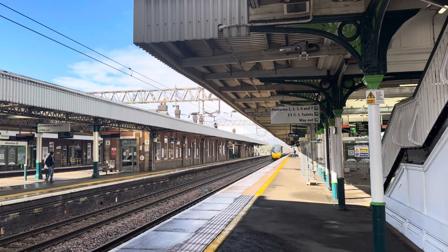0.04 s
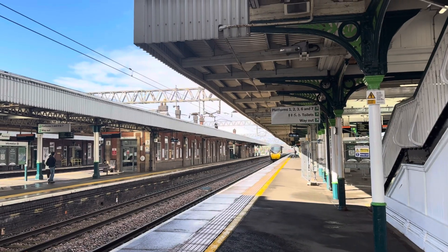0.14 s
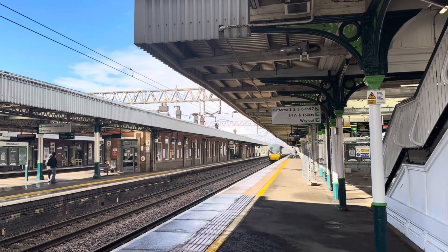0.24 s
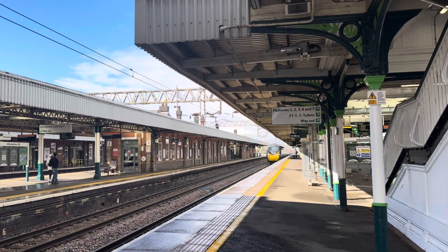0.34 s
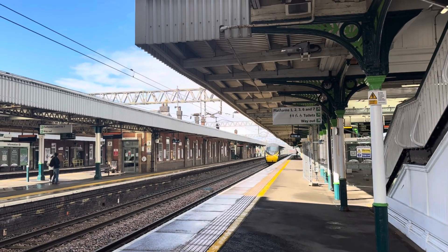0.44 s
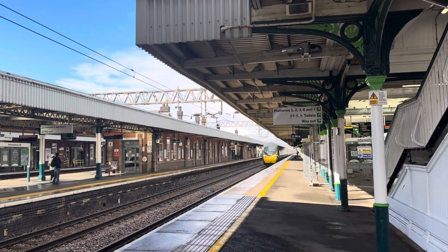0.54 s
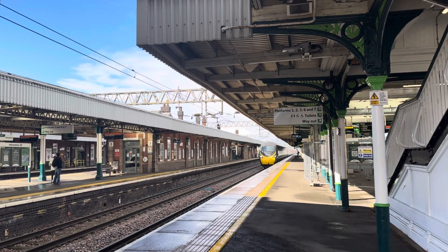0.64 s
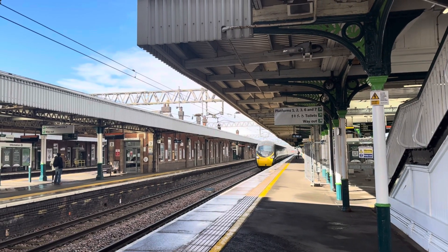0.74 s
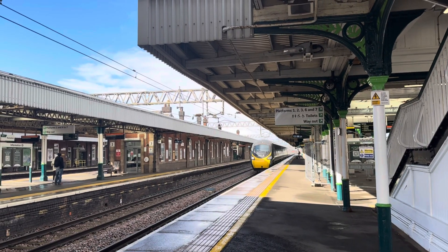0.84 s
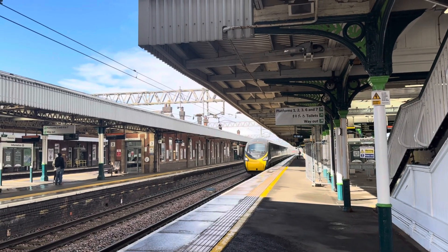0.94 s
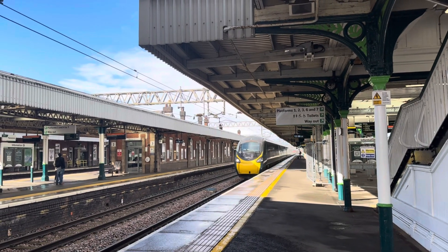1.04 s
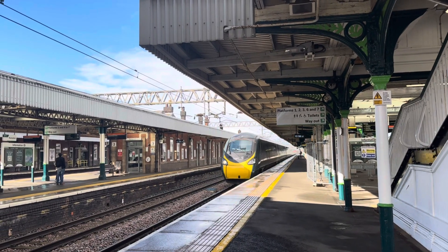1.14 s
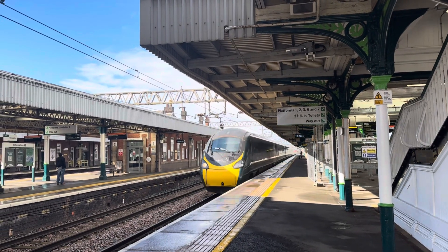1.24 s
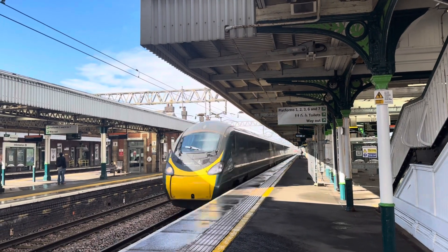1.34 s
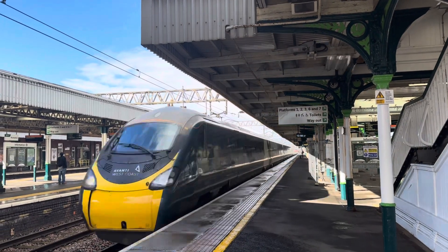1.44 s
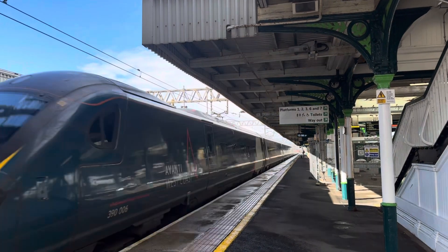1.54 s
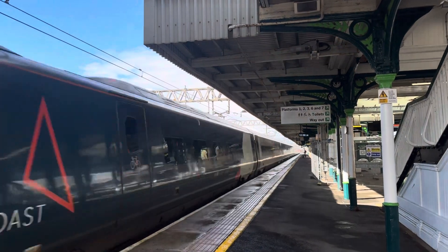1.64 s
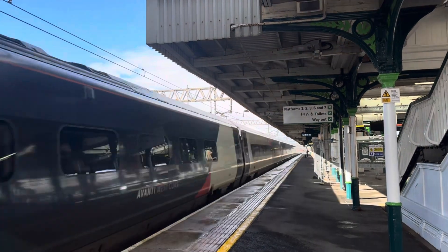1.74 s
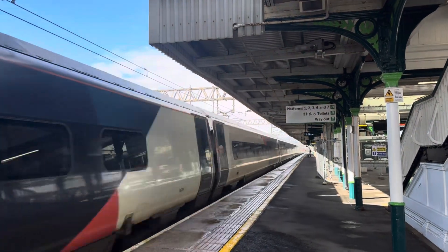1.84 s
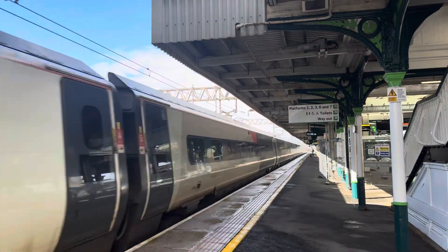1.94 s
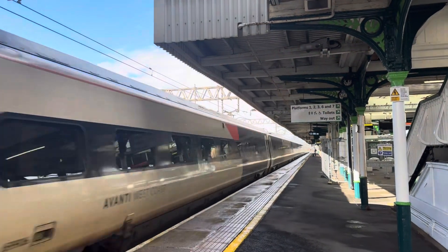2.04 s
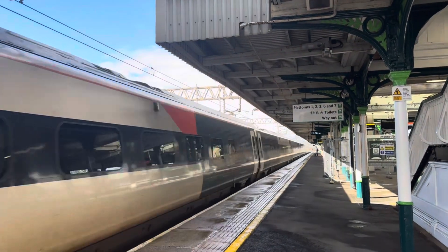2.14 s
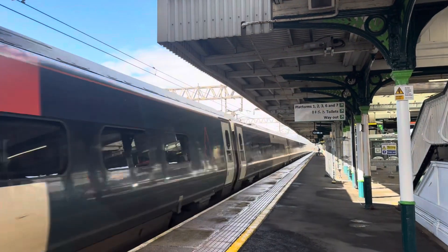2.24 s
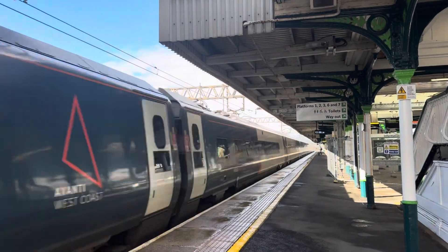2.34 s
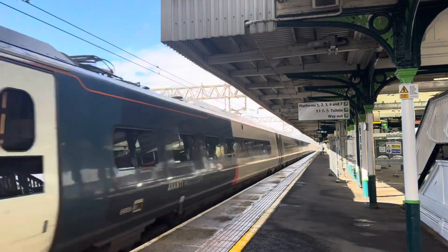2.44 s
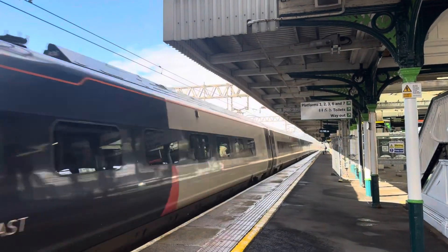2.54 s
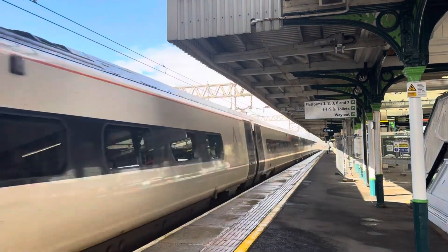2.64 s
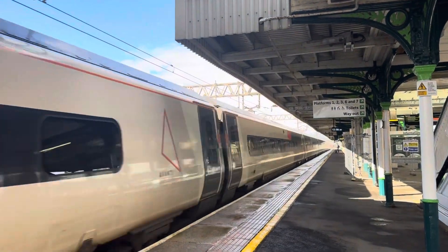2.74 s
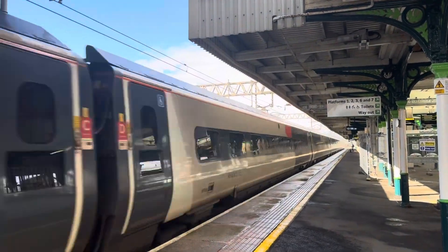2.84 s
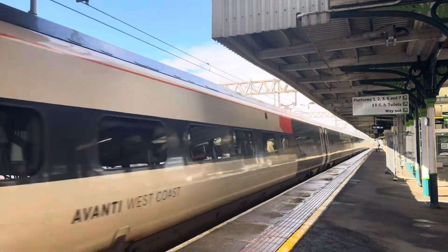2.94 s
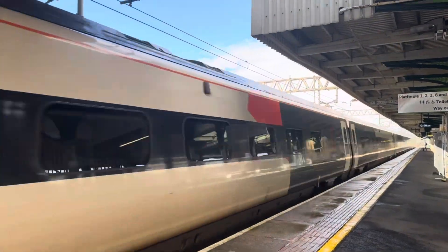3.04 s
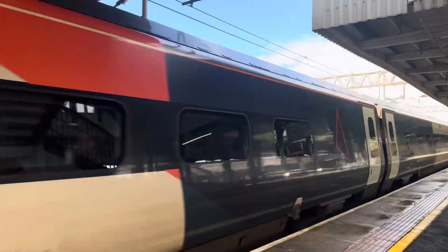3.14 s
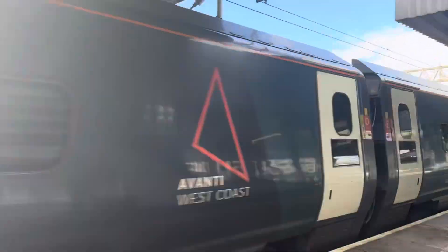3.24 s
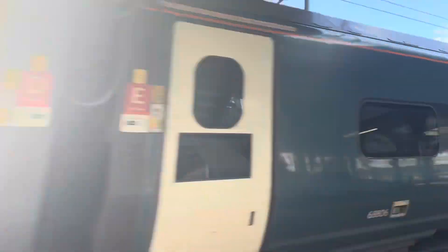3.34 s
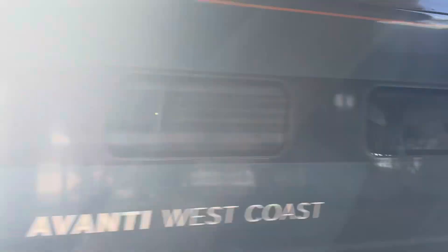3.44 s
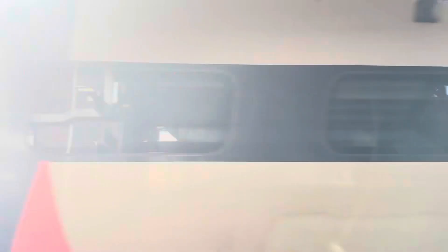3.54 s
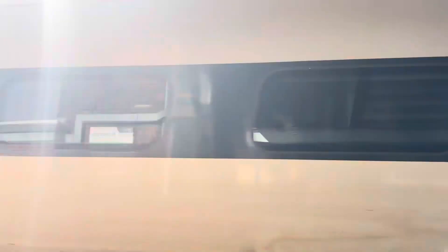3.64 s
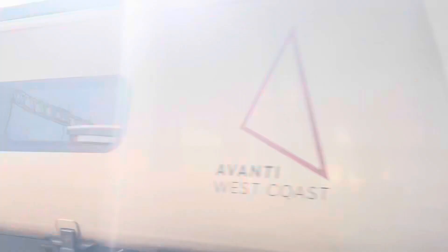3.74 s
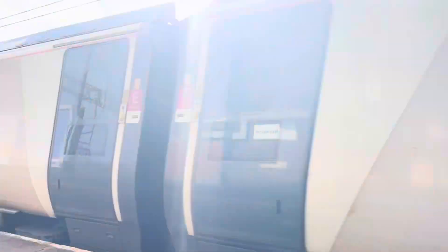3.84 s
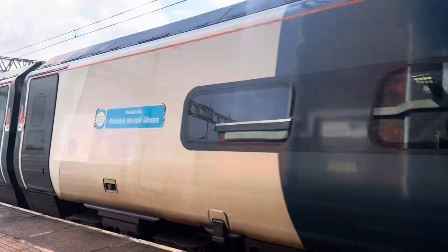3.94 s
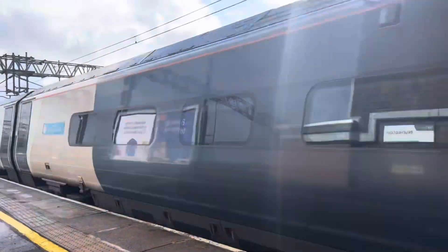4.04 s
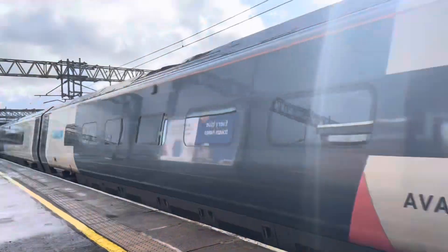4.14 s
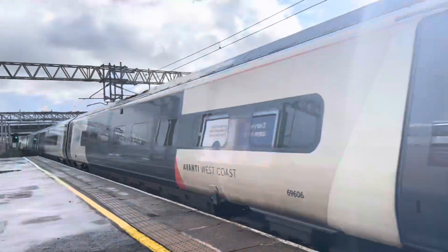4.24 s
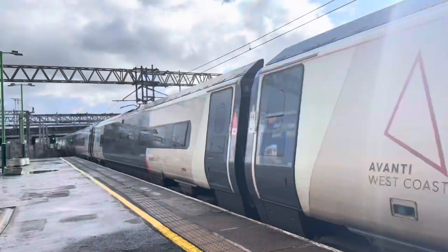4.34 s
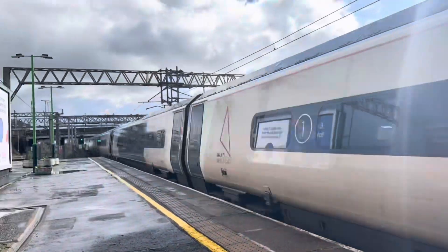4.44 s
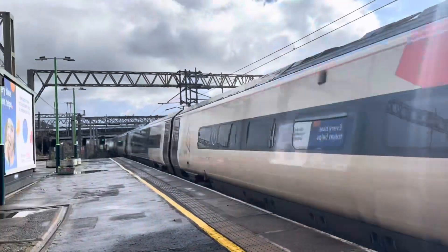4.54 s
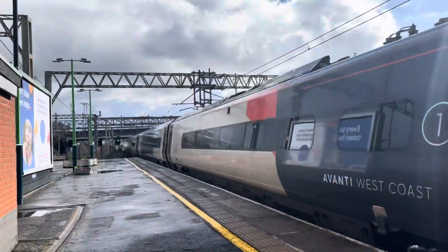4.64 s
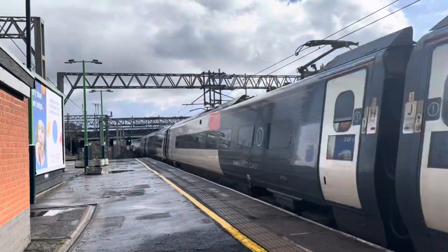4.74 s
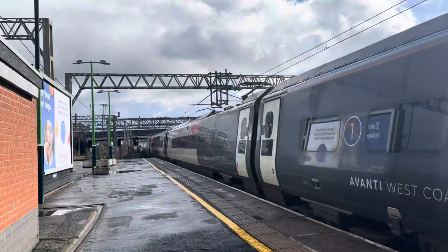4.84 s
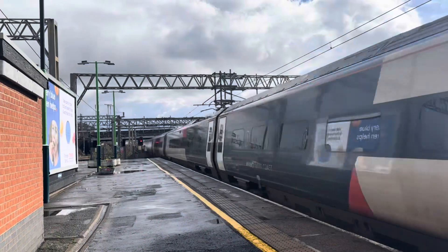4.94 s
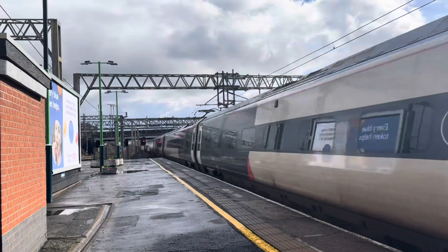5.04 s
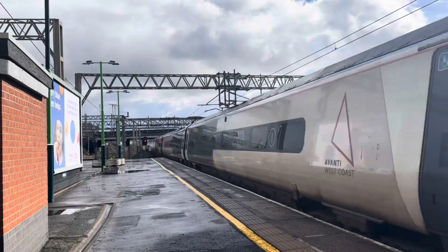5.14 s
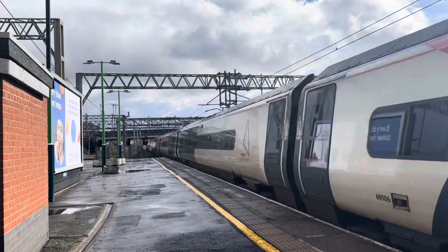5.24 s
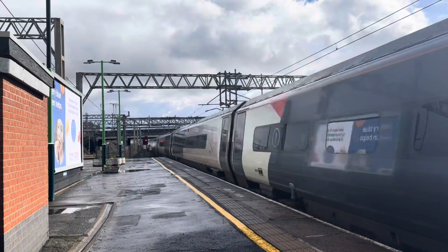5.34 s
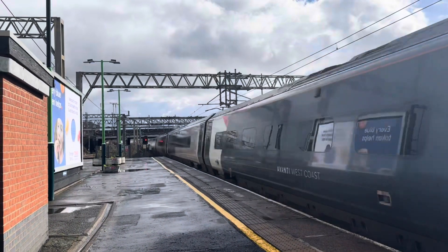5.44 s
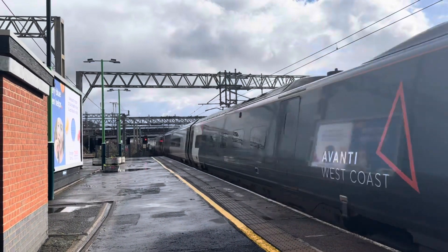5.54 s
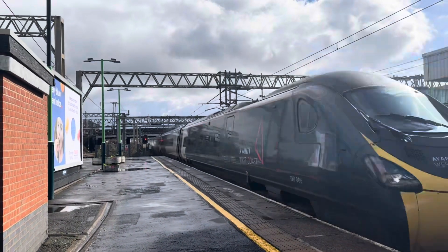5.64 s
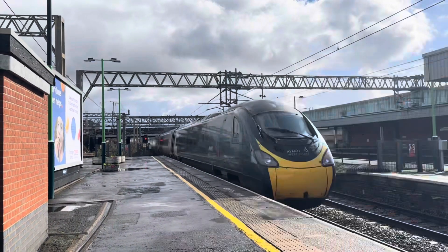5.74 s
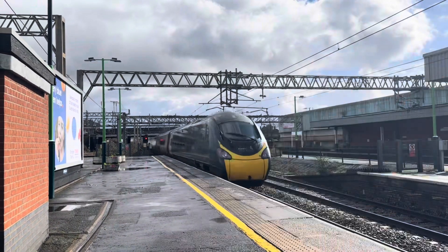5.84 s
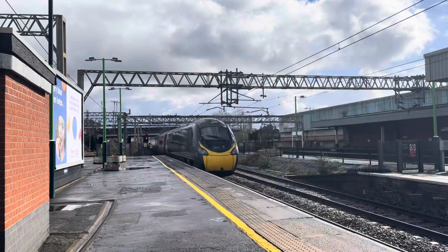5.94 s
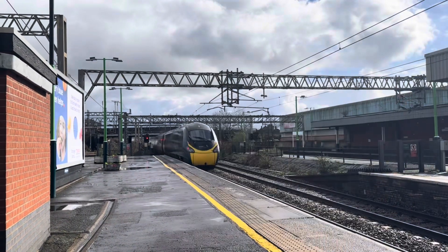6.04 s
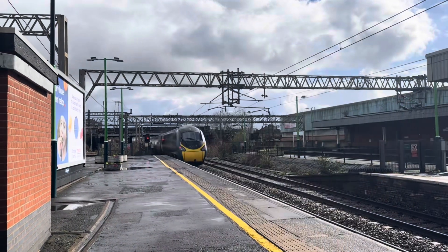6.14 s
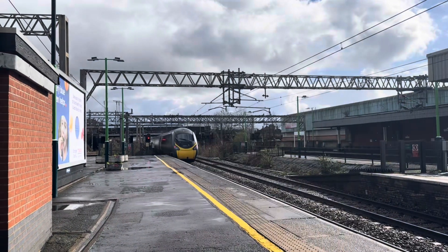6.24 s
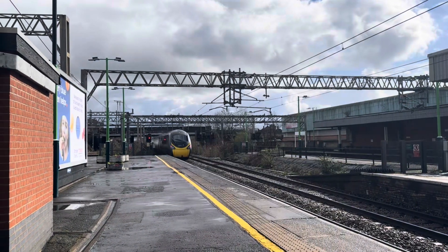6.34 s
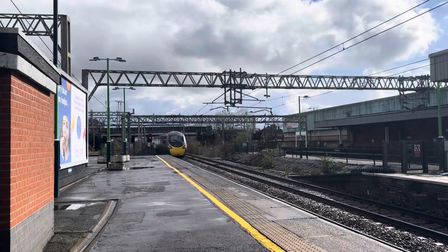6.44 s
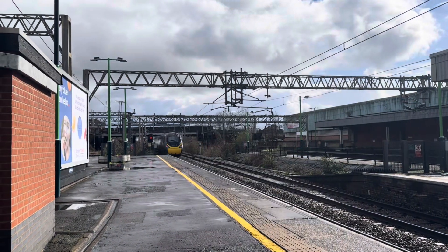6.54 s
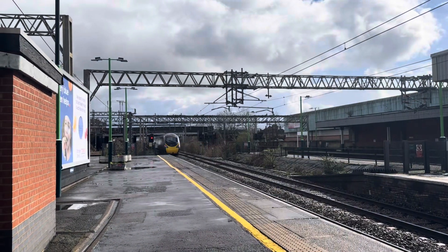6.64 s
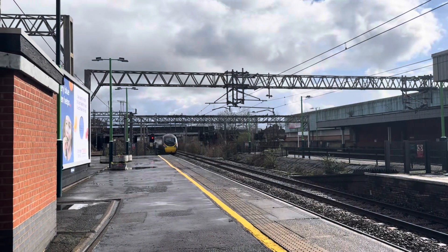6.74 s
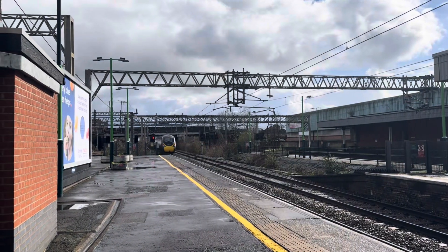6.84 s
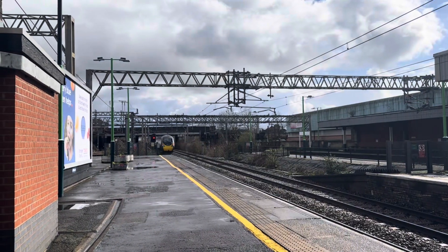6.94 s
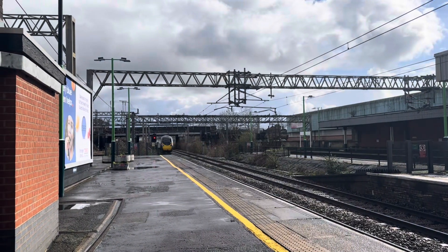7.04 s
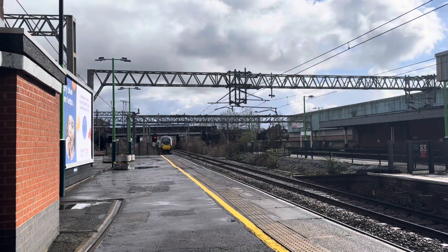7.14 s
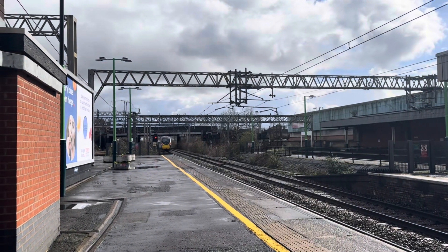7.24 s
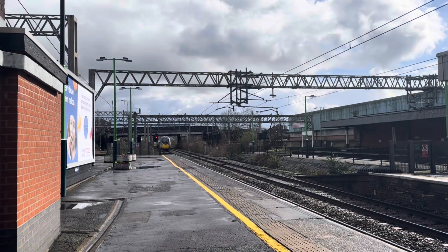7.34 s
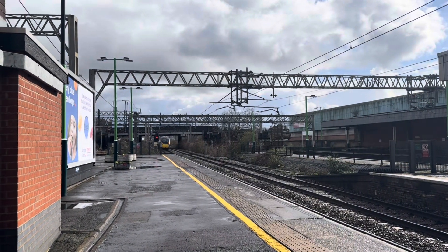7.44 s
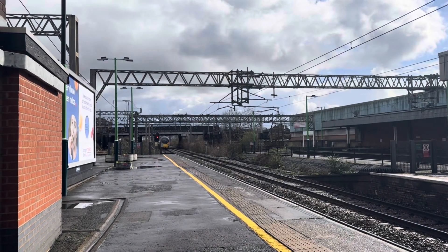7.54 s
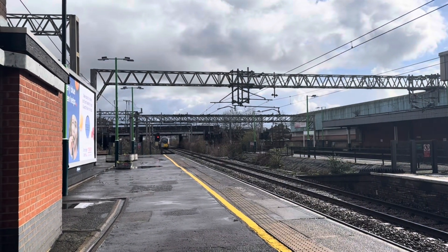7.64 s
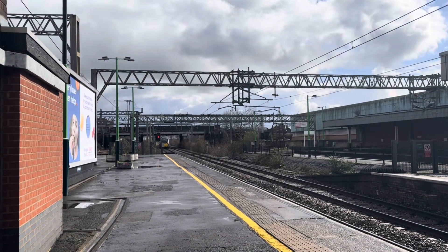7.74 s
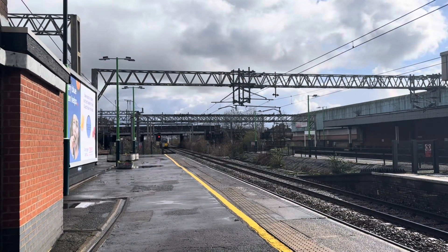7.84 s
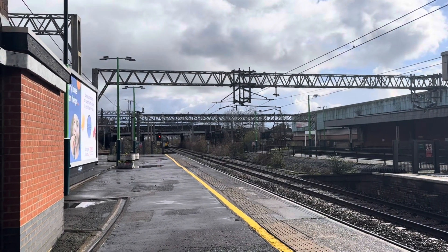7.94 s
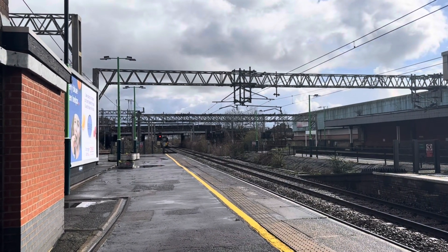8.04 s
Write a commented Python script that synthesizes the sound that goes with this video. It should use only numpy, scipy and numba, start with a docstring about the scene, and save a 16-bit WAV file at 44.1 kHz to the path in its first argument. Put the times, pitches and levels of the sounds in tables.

```python
"""On a station platform an electric express runs past a phone, which turns to follow it.
The rails sing ahead of the train as thin modes and hiss of filtered noise. Resonant noise makes the
track rumble, boom and rings of rails and wheels; shaped noise makes body roar, rushing air and station.
They swell with the nose, pulse with each pair of bogies and die away behind the tail."""
import sys
import numpy as np
from scipy import signal
from scipy.fft import rfft, irfft, next_fast_len
from scipy.io import wavfile
from scipy.ndimage import uniform_filter1d
from numba import njit

SR = 44100
rng = np.random.default_rng(int(sys.argv[2]) if len(sys.argv) > 2 else 0)


def log_audio(samples):
    """Write samples as a 16-bit WAV file to the path given in sys.argv[1]."""
    # one column per channel
    frames = np.atleast_2d(samples).T
    # limit to full scale, then quantise
    limited = np.clip(frames, -1, 1)
    pcm = np.round(limited * 32767).astype(np.int16)
    wavfile.write(sys.argv[1], SR, pcm)


N = 357651
SIZE = next_fast_len(N)  # transform length in samples

# All widths below are those of one pass of a resonance; ring() passes the noise twice.
# A half length is the time in which a bell-shaped rise falls to 1/e of its height.

# Singing rails. Each row: mode in Hz, width in Hz, dB ahead of the train, dB behind it (added to the approach
# and departure levels).
SINGING_MODES = [(6420, 60, -14, -11), (6870, 70, -9, -9), (7170, 70, -20, -3), (7310, 50, -8, -18),
                 (7670, 45, -1.5, -18), (8390, 80, -9, -15), (10700, 80, -6, -9)]
# Broad hiss of the rails. Each row: centre in Hz, width in Hz, dB ahead, dB behind (added likewise).
RAIL_HISS = [(1370, 850, 14.3, 5), (3900, 1700, 7.6, -12), (7860, 7700, 0.99, -2),
             (10200, 14000, 0.77, 5.5), (11500, 6000, 4.1, 6.5)]
# Level of the singing on approach. Each row: time in seconds, level in dB.
SINGING_AHEAD = [(0, -53), (.5, -49), (1.0, -46), (1.3, -47), (1.7, -80)]
# Level of the singing after departure. Each row: time in seconds, level in dB.
SINGING_BEHIND = [(5.2, -85), (5.9, -61), (6.5, -63), (7.3, -67), (8.11, -77)]
SING_WAVER, SING_FLICKER_DB = .002, 2.5  # rms share of the pitch; rms patchiness

# Station background spectrum. Each row: frequency in Hz, relative level in dB per Hz.
STATION_SPECTRUM = [(30, -5), (90, 8), (200, 1.5), (500, -39), (1200, -50), (2000, -15.5), (5000, -31.5),
                    (8000, -73), (11000, -50), (15800, -40)]
STATION_DB = -41

# Level of each layer before the swells. Each row: time in seconds, then in dB: buffeting air, track rumble,
# underframe boom, body roar, rail ring, wheel ring, air rush.
PASSING = [(0, -48, -29.5, -45, -37.5, -32.5, -38, -47), (.35, -28, -24.5, -33.5, -31.5, -33.5, -35.5, -43),
           (.8, -28, -19.5, -34, -23.5, -24.5, -33.5, -35), (1.26, -29, -12.5, -29, -14.5, -21, -27, -26),
           (1.6, -22, -20.5, -19.5, -14.5, -20.5, -26, -24.5),
           (1.83, -28, -22.5, -18.5, -17, -31.5, -26.5, -26),
           (2.25, -31.5, -30.5, -24, -22, -29.5, -27.5, -29.5),
           (2.68, -31, -22.5, -25, -25, -35, -31.5, -32.5), (3.6, -38, -25, -30, -27, -32.5, -32, -33.5),
           (4.45, -36.5, -25, -29.5, -27.5, -36.5, -32, -34.5),
           (5.4, -31, -25, -28, -27.5, -33.5, -33, -33), (5.65, -30.5, -27, -26, -28, -35.5, -35, -35),
           (5.94, -39, -32, -35, -38.5, -40, -41, -42.5), (6.4, -39, -41, -40, -42.5, -44, -44.5, -47),
           (7.1, -39, -42, -42.5, -46.5, -49, -49, -58), (7.6, -40.5, -43.5, -44, -57, -53, -51.5, -66),
           (8.11, -47, -52, -47, -53.5, -52, -58, -67)]
# Pairs of bogies. Each row: time abreast in seconds, wheel mode in Hz before Doppler shift, its level in dB
# before fading, dB louder from behind, fading distance in m, then swell in dB of roar, rail ring, wheel ring, air rush.
BOGIES = [(1.26, 2100, -35.5, 15, 26, 0, -0.5, -7, 1), (2.02, 2390, -34.5, -2, 40, 1.5, 5, 5, 3.5),
          (2.47, 2230, -41, -8, 36, 1.5, 6.5, 3, 2.5), (2.9, 2298, -42, -3.5, 40, 1, 6.5, 3.5, 2.5),
          (3.36, 2255, -39, 4, 47, 2, 1.5, 4, 2), (3.8, 2250, -43, -1, 43, 0.5, 3.5, 2.7, 2),
          (4.21, 2315, -42, 6, 45, -0.5, 4, -1, 2.5), (4.66, 2300, -41.5, 10, 60, 5.5, 6, 1.5, 3),
          (5.12, 2300, -40, 8, 30, 2.5, 4, 0.5, 3), (5.55, 2250, -52, 9, 78, -3, 1, 1, 1)]
# Half lengths in seconds of those four swells, in the same order.
SWELL_S = (.06, .08, .09, .11)
# Lags in seconds of the four swells after the time abreast.
SWELL_LAG_S = (-0.015, 0.0065, 0.006, 0.013)
# Gusts of the slipstream, the centre gliding between them. Each row: time in seconds, centre in Hz,
# buffet rise in dB, boom rise in dB, half length in seconds.
GUSTS = [(.09, 55.7, 14, 3, .04), (0.347, 54, 10.5, -4, 0.1), (1.445, 51.5, 6, 7, 0.061),
         (1.7, 40, 13, 5, 0.056), (1.785, 38, 15, -4.5, 0.037), (2.04, 52, 7, -1, 0.069),
         (2.44, 55, 9.5, 0, 0.074), (2.88, 55, 6, 5.5, 0.037), (3.36, 55, 7, 2, 0.094),
         (3.86, 60, 10, 3, 0.08), (4.14, 56.7, 8, 0, .05), (4.77, 60, 8, 4, 0.046),
         (5.63, 46, 12, 3.5, 0.097), (5.95, 52, 10.5, 0, 0.055), (6.798, 54.6, -3, 6, 0.084),
         (7.5, 54, -1, 7.5, 0.087)]
# Surges of the track rumble, the centre gliding between them. Each row: time in seconds, centre in Hz,
# rise in dB, half length in seconds.
SURGES = [(0.11, 68, 7.5, .055), (0.46, 76, 3.5, .03), (.715, 68, 4, 0.021), (1.13, 84, 2.5, 0.063),
          (1.8, 76.5, 6, 0.036), (1.943, 76, 13, 0.056), (2.09, 82, 6.5, 0.073), (2.435, 101, 7, 0.21),
          (2.935, 93, 6, 0.055), (3.08, 86, -3, 0.055), (3.64, 82.6, 7, 0.1), (3.813, 108, 11.5, 0.036),
          (4.06, 90, -4, .06), (4.28, 95, 11, 0.035), (4.623, 114, 5, 0.094), (5.0, 89.4, 2.5, .1),
          (5.812, 81.5, 8, 0.032), (6.497, 101, 10, 0.051), (6.796, 85, 9.5, 0.067), (6.996, 76, 9, 0.059),
          (7.547, 109, 9.5, 0.078), (8.027, 72.5, 13, 0.071)]
BUFFET_WIDTH_HZ, BUFFET_WAVER_DB = 21.6, 2.5
RUMBLE_WIDTH_HZ, RUMBLE_WAVER_DB = 42, 1.2
FLARE_S, FLARE_DB, FLARE_HALF_S = 5.28, 4, 0.063  # the air hiss flares once near the tail

BOOM_HZ, BOOM_WIDTH_HZ = 160.7, 159
# Body roar spectrum. Each row: frequency in Hz, relative level in dB per Hz.
ROAR_SPECTRUM = [(150, -26), (230, -1.5), (300, -1), (400, -4), (600, -7), (1000, -9.5), (1400, -15),
                 (2500, -18), (5000, -40.5)]

# Broad rail resonances. Each row: centre in Hz before the drift, width in Hz, relative level in dB.
RAIL_MODES = [(711, 234, -3), (891, 190, -5.5)]
# Broad wheel resonances. Each row: centre in Hz before the drift, width in Hz, relative level in dB.
WHEEL_MODES = [(2250, 1200, -1), (1618, 590, -3)]
# Pitch drift of the broad steel ring. Each row: time in seconds, factor.
STEEL_PITCH = [(0, 0.96), (1.2, 0.93), (1.9, 0.98), (3.5, 1.01), (5.3, 0.95), (6.0, 0.91), (8.11, 0.98)]
# Sharpest rail mode, between two sleepers. Each row: time in seconds, centre in Hz, dB over the broad rail
# ring before the pulses.
RAIL_TONE = [(0, 800, -17), (.6, 810, -1), (1.3, 855, -10), (2.0, 785, -5.5), (4.2, 760, 2.5),
             (5.15, 790, 0.5), (5.8, 710, -2.5), (6.5, 695, 2), (7.0, 665, -0.5), (7.5, 692, 3.5),
             (8.11, 700, -13)]
RAIL_TONE_WIDTH_HZ = 60
TONE_PULSE_DB, TONE_PULSE_S, TONE_FLUTTER_DB = 4.5, 0.16, 1.5  # pulse height, its half length, rms flutter

SPEED, SOUND, TRACK_M = 54, 343, 9  # train in m/s, sound in m/s, distance to the track
WHEEL_MODE_WIDTH_HZ, WHEEL_FLUTTER_DB = 160, 3
MODE_LAG_S = 0.055  # wheel modes pass this long after the time abreast
FADE_DB = 6  # lost to air and screening at a pair's fading distance

# Air rush spectrum. Each row: frequency in Hz, relative level in dB per Hz.
AIR_SPECTRUM = [(1500, -12), (2800, -2), (4000, -2.5), (6500, -5), (8300, -4), (10500, -9.5),
                (12500, -13.5), (15800, -21.5)]
# Borders in Hz between the bands of air that flicker separately.
AIR_SPLIT_HZ = (4500, 6500, 9000, 12000)

# Brief wheel whistles, the centre gliding between them. Each row: time in seconds, centre in Hz, level in dB,
# half length in seconds.
WHISTLES = [(.62, 1580, -35, .06), (1.4, 1795, -32, .06), (1.56, 1893, -24.5, 0.11),
            (1.97, 2400, -34, 0.08), (2.07, 1850, -28, .04), (2.59, 2170, -36, 0.037),
            (2.99, 2305, -31, 0.098), (3.294, 2340, -32.5, 0.075), (3.39, 2100, -38, .05),
            (3.63, 1940, -39, 0.098), (4.43, 2020, -37, .05), (5.3, 1994, -35, 0.065)]
WHISTLE_WIDTH_HZ, WHISTLE_SPLIT = 75, .025  # each strand's mean offset is this share of the centre
# Knocks under the floor. Each row: time in seconds, centre in Hz, level in dB.
KNOCKS = [(4.643, 420, -26), (4.66, 620, -26), (5.085, 910, -28)]
KNOCK_HALF_S, KNOCK_WIDTH_HZ = 0.012, 160
# Two strands left ringing behind the tail. Each row: time in seconds, level in dB, lower Hz, upper Hz.
STRANDS = [(5.5, -80, 1930, 2050), (6.0, -53, 1930, 2060), (6.4, -54, 1900, 1975), (6.7, -54, 1900, 1980),
           (7.35, -56, 1900, 2030), (7.7, -67, 1900, 2000)]
STRAND_WIDTH_HZ = 35

# Bass of the two channels in every view. Each row: frequency in Hz, likeness from 0 to 1, radians by which
# the right leads, left minus right in dB.
STEREO_BASS = [(30, .96, 0, 0), (80, .975, 0, 0), (150, .92, 0, .2)]
# Channels with the train ahead. Each row: frequency in Hz, likeness, right lead in radians, left minus right in dB.
TRAIN_AHEAD = [(400, 0.92, 0.34, 1), (800, 0.67, -1, 4), (1060, 0, -1, 7), (1420, 0.77, 2.5, 2),
               (1970, 0.45, -0.5, -0.5), (2840, 0.87, -2, 5.5), (3820, 0.37, 1, 2.5),
               (6150, 0.15, -6, -0.5), (6900, 0.35, 8, 0)]
# Channels with the train on the left. Each row: frequency in Hz, likeness, right lead in radians, left minus
# right in dB.
TRAIN_LEFT = [(440, 0.95, -1, 0), (800, 0.87, -1.5, 4.5), (1210, 0.34, -3, 2), (1500, 0.65, -4.5, 0),
              (2040, 0.45, -6, 0.5), (2935, 0.68, -9, 5), (3714, 0.72, 7, 5.5), (5970, 0.68, -28, 0.5),
              (6870, 0.14, 9.5, -0.5)]
# Channels with the train on the right. Each row: frequency in Hz, likeness, right lead in radians, left minus
# right in dB.
TRAIN_RIGHT = [(400, 0.7, 0.61, 0.5), (800, 0.29, 0.26, -0.5), (1110, 0.34, 0.84, 1), (1480, 0.16, 1.8, 0),
               (2100, 0.38, -0.17, 0), (2630, 0.68, -1.93, 3), (4000, 0.1, -0.48, 2),
               (6140, 0.4, -0.01, 0.5), (7000, 0.1, 0.99, -0.5)]
# Place of the train as the phone turns. Each row: time in seconds, share on the left, share on the right.
VIEW = [(0, 0, 0), (1.3, 0, 0), (1.7, 1, 0), (3.3, 1, 0), (3.8, 0, 1), (5.5, 0, 1), (5.9, 0, 0),
        (8.11, 0, 0)]
# Above this frequency likeness and lead are fixed by these settings instead of the tables.
TREBLE_HZ, TREBLE_LAG_S, TREBLE_LIKENESS = 7500, 14 / SR, .82
MIC_LOW_HZ, TOP_HZ = 38, 15700  # edges of the phone's pass band


def undb(db):
    """Decibel law: amplitude ratio from level."""
    return 10 ** (np.asarray(db) / 20)


def curves(table):
    """Linear interpolation: the columns of a time table, one value per sample."""
    s, *columns = np.transpose(table)
    return [np.interp(np.arange(N) / SR, s, c) for c in columns]


def unit(x):
    """Normalisation to rms 1."""
    return x / np.sqrt(np.mean(x ** 2))


@njit
def svf(x, g, k):
    """State-variable resonance: a band-pass with a moving centre, gain 1 there."""
    y, band, low = np.empty(len(x)), 0., 0.
    for i in range(len(x)):
        v = (band + g[i] * (x[i] - low)) / (1 + g[i] * (g[i] + k[i]))
        band, low = 2 * v - band, low + 2 * g[i] * v
        y[i] = k[i] * v
    return y


def ring(hz, width_hz):
    """Resonance under random excitation: noise through one band-pass, applied twice; rms 1."""
    g = np.tan(np.pi * hz / SR) * np.ones(N)
    k = width_hz / hz * np.ones(N)
    once = svf(rng.standard_normal(N), g, k)
    return unit(svf(once, g, k))


def coloured(spectrum):
    """Spectral shaping: noise with a (Hz, dB) spectrum; rms 1."""
    hz, db = np.transpose(spectrum)
    log_hz = np.log(np.arange(1, SIZE // 2 + 2) * SR / SIZE)
    gain = undb(np.interp(log_hz, np.log(hz), db, left=-90))
    return unit(irfft(rfft(rng.standard_normal(SIZE)) * gain, SIZE)[:N])


def walk(rate):
    """Slow random modulation: levels held 1 / rate s and smoothed twice; rms 1."""
    k = int(SR / rate)
    held = np.repeat(rng.standard_normal(N // k + 1), k)
    return unit(uniform_filter1d(uniform_filter1d(held, k), k)[:N])


def steady(x, span_s, share):
    """Envelope levelling: a driven structure wavers less than free noise; rms 1."""
    power = uniform_filter1d(x ** 2, int(span_s * SR))
    return unit(x / power ** (np.clip(share, 0, 1) / 2))


def swells(times, rises, half_s):
    """Gaussian envelopes: bell-shaped rises around each moment, added together."""
    t = np.arange(0, N + 64, 64) / SR  # every 64 samples suffices
    bells = np.exp(-((t[:, None] - times) / np.maximum(half_s, .01)) ** 2)
    return np.interp(np.arange(N) / SR, t, bells @ rises)


def bursts(times, db, half_s, hz, width_hz):
    """Transient resonance: one resonance that sounds briefly around each moment."""
    return swells(times, undb(db), half_s) * steady(ring(hz, width_hz), .04, share=.6)


def singing_rails():
    """Bending waves along the rails: thin modes and broad hiss before and after the train."""
    (ahead_db,), (behind_db,) = curves(SINGING_AHEAD), curves(SINGING_BEHIND)
    flickers = [undb(SING_FLICKER_DB * walk(9)) for _ in SINGING_MODES] + [1] * len(RAIL_HISS)
    total = 0
    for flicker, (hz, width, ahead, behind) in zip(flickers, SINGING_MODES + RAIL_HISS):
        gain = undb(ahead_db + ahead) + undb(behind_db + behind)
        total = total + flicker * gain * ring(hz * (1 + SING_WAVER * walk(7)), width)
    return total


def station():
    """Stationary random noise: the constant background of the station."""
    return undb(STATION_DB) * coloured(STATION_SPECTRUM)


def levels():
    """Superposed level contours: the slow passing, lifted by gusts, surges and pairs of bogies."""
    buffet_db, rumble_db, boom_db, *rolling_db = curves(PASSING)
    s, _, buffet_rise, boom_rise, half = np.transpose(GUSTS)
    buffet_db = buffet_db + swells(s, buffet_rise, half) + BUFFET_WAVER_DB * walk(9)
    boom_db = boom_db + swells(s, boom_rise, half)
    s, _, rise, half = np.transpose(SURGES)
    rumble_db = rumble_db + swells(s, rise, half) + RUMBLE_WAVER_DB * walk(8)
    columns = np.transpose(BOGIES)
    s, rises = columns[0], columns[5:]
    rolling_db = [db + swells(s + lag, rise, half)
                  for db, rise, half, lag in zip(rolling_db, rises, SWELL_S, SWELL_LAG_S)]
    rolling_db[-1] = rolling_db[-1] + swells(np.array([FLARE_S]), np.array([FLARE_DB]), FLARE_HALF_S)
    return buffet_db, rumble_db, boom_db, *rolling_db


def buffeting():
    """Low-frequency slipstream pressure: noise in a narrow band whose centre glides from gust to gust."""
    return steady(ring(curves(GUSTS)[0], BUFFET_WIDTH_HZ), 0.045, share=0.78)


def track_rumble():
    """Track resonance: noise in a low band whose centre glides from surge to surge."""
    return steady(ring(curves(SURGES)[0], RUMBLE_WIDTH_HZ), 0.04, share=0.7)


def underframe_boom():
    """Damped resonance of the underframe: one wide band of noise."""
    return ring(BOOM_HZ, BOOM_WIDTH_HZ)


def body_roar():
    """Broadband radiation from the coach bodies: noise of a fixed spectrum."""
    return coloured(ROAR_SPECTRUM)


def steel(modes):
    """Roughness excitation: rough wheels on rough rails shake a few broad resonances of drifting pitch."""
    shift, = curves(STEEL_PITCH)
    return unit(sum(undb(db) * ring(hz * shift, width) for hz, width, db in modes))


def ringing_rails():
    """Modal vibration of the rail: a broad ring and a sharp mode pulsing under each pair of bogies."""
    tone_hz, tone_db = curves(RAIL_TONE)
    s = np.transpose(BOGIES)[0]
    pulse_db = swells(s, TONE_PULSE_DB + 0 * s, TONE_PULSE_S) - TONE_PULSE_DB / 2
    tone_db = tone_db + pulse_db + TONE_FLUTTER_DB * walk(12)
    return steel(RAIL_MODES) + undb(tone_db) * steady(ring(tone_hz, RAIL_TONE_WIDTH_HZ), .04, share=.5)


def bogies():
    """Doppler effect and 1 / distance spreading: pitch and gain of each pair's wheel mode."""
    passes, t = [], np.arange(N) / SR
    for s, mode_hz, db, rear_db, fade_m, *_ in BOGIES:
        along = SPEED * (s + MODE_LAG_S - t)
        distance = np.hypot(along, TRACK_M)
        toward = along / distance  # 1 approaching, -1 receding
        fade_db = FADE_DB * (distance / fade_m) ** 3
        heard_db = db - rear_db * toward - fade_db + WHEEL_FLUTTER_DB * walk(8)
        heard_hz = mode_hz / (1 - toward * SPEED / SOUND)
        passes.append((heard_hz, undb(heard_db) * TRACK_M / distance))
    return passes


def passing_wheels(wheels):
    """Resonance of a moving source: noise through each pair's wheel mode as it is heard."""
    return sum(gain * ring(hz, WHEEL_MODE_WIDTH_HZ) for hz, gain in wheels)


def eddies():
    """Turbulent intermittency: flicker in dB of each air band, partly shared, the top band most."""
    gusts_db = .7 * walk(8)
    return [gusts_db + spread_db * walk(16) for spread_db in (.6, .9, 1.3, 1.7, 2.0)]


def rush(eddies_db):
    """Turbulence noise: air torn along the coach sides, a hiss whose bands flicker."""
    hiss = rfft(coloured(AIR_SPECTRUM), SIZE)
    band = np.digitize(np.arange(len(hiss)) * SR / SIZE, AIR_SPLIT_HZ)
    return sum(undb(db) * irfft(hiss * (band == k), SIZE)[:N] for k, db in enumerate(eddies_db))


def wheel_whistles():
    """Split modes: each whistle is a pair of thin strands that waver about its centre."""
    s, _, db, half = np.transpose(WHISTLES)
    centre_hz = curves(WHISTLES)[0]
    total = 0
    for side in (-1, 1):
        strand_hz = centre_hz * (1 + WHISTLE_SPLIT * (side + .5 * walk(10)))
        total = total + bursts(s, db - 3, half, strand_hz, WHISTLE_WIDTH_HZ)  # half the power each
    return total


def floor_knocks():
    """Impulsive excitation: brief bursts of a resonance under the floor."""
    s, _, db = np.transpose(KNOCKS)
    return bursts(s, db, KNOCK_HALF_S, curves(KNOCKS)[0], KNOCK_WIDTH_HZ)


def lingering_strands():
    """Lightly damped modes: two thin strands that linger in the rails behind the tail."""
    db, *strands_hz = curves(STRANDS)
    return sum(undb(db + 2 * walk(6)) * steady(ring(hz, STRAND_WIDTH_HZ), .06, share=.5)
               for hz in strands_hz)


def train(layers_db, wheels, eddies_db):
    """Superposition of sources: one ray of the passing train, its noise drawn anew at every call."""
    buffet, rumble, boom, roar, rail, wheel, air = (undb(db) for db in layers_db)
    low = buffet * buffeting() + rumble * track_rumble()
    body = boom * underframe_boom() + roar * body_roar()
    rolling = rail * ringing_rails() + wheel * steel(WHEEL_MODES) + passing_wheels(wheels)
    events = wheel_whistles() + floor_knocks() + lingering_strands()
    return low + body + rolling + air * rush(eddies_db) + events


def channels(near, other, table):
    """Partial coherence: both sides share one ray, phase-shifted; the right adds an unrelated one."""
    hz = np.arange(len(near)) * SR / SIZE
    table_hz, *columns = np.transpose(table)
    like, lead, balance_db = (np.interp(hz, table_hz, c) for c in columns)
    # the shared treble is inverted and slightly late on the left
    treble = hz > TREBLE_HZ
    like = np.clip(np.where(treble, TREBLE_LIKENESS, like), 0, 1)
    lead = np.where(treble, np.pi + 2 * np.pi * hz * TREBLE_LAG_S, lead)
    right = like * np.exp(1j * lead) * near + np.sqrt(1 - like ** 2) * other
    pair = np.array([near * undb(balance_db / 2), right * undb(-balance_db / 2)])
    return irfft(pair, SIZE)[:, :N]


def scene():
    """Superposition of two rays, cross-faded between three views as the phone turns."""
    layers_db, wheels, eddies_db = levels(), bogies(), eddies()
    near, other = (rfft(singing_rails() + station() + train(layers_db, wheels, eddies_db), SIZE)
                   for _ in range(2))
    left, right = curves(VIEW)
    views = zip((1 - left - right, left, right), (TRAIN_AHEAD, TRAIN_LEFT, TRAIN_RIGHT))
    return sum(share * channels(near, other, STEREO_BASS + table) for share, table in views)


def record(dry):
    """Band limiting and saturation: the phone loses the deepest bass, rounds loud peaks and cuts the top."""
    heard = signal.sosfilt(signal.butter(2, MIC_LOW_HZ, "high", fs=SR, output="sos"), dry)
    rounded = .97 * heard / (1 + heard ** 8) ** (1 / 8)
    return signal.sosfilt(signal.ellip(14, .2, 90, TOP_HZ, fs=SR, output="sos"), rounded)


dry = scene()
out = record(dry)
log_audio(out)
```